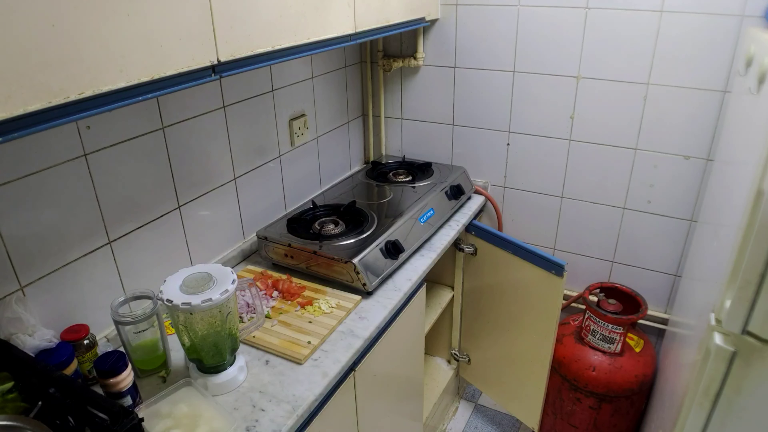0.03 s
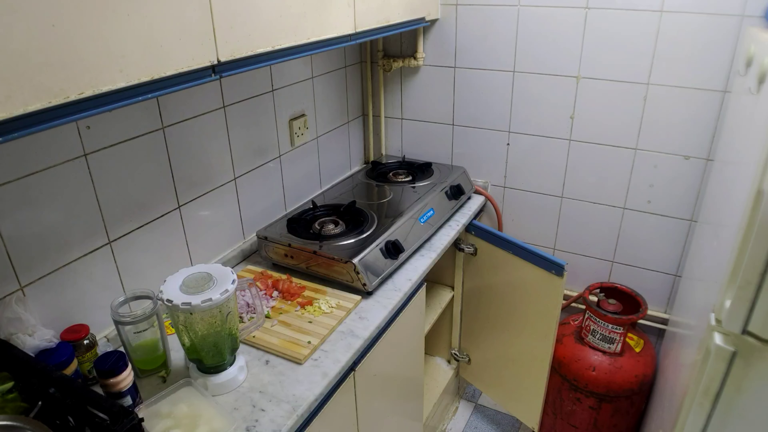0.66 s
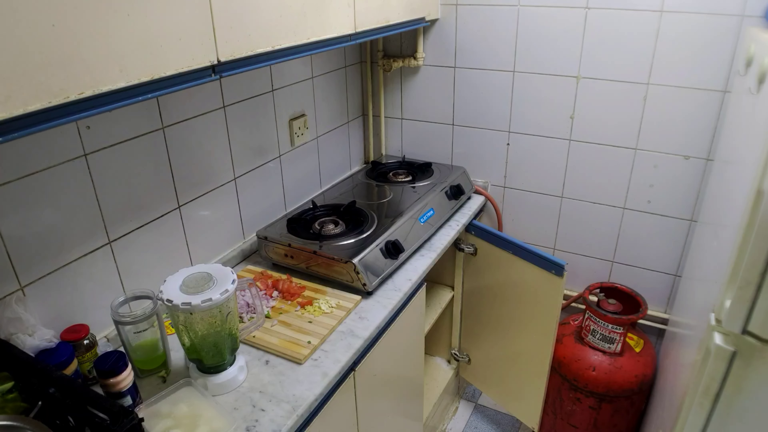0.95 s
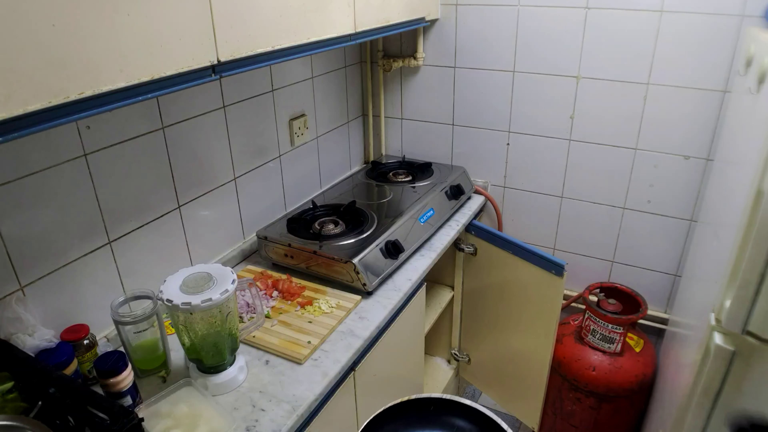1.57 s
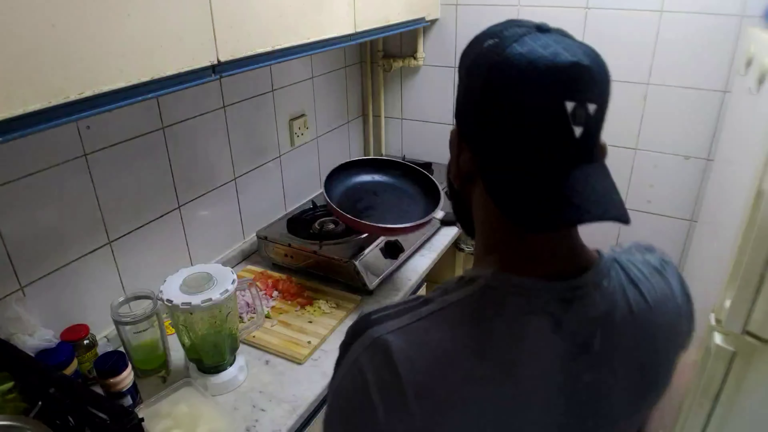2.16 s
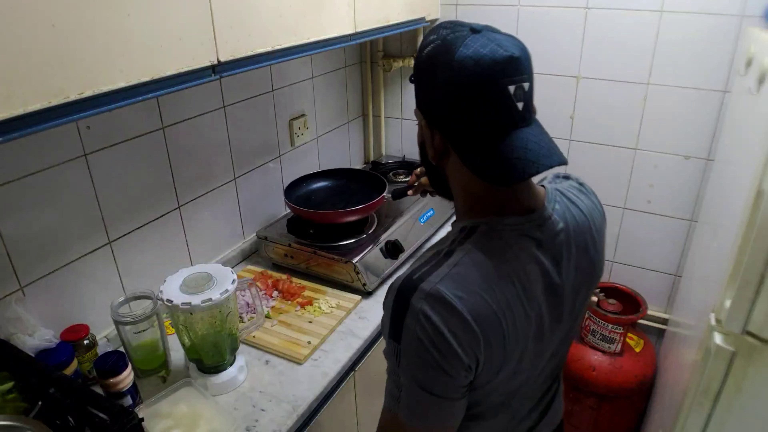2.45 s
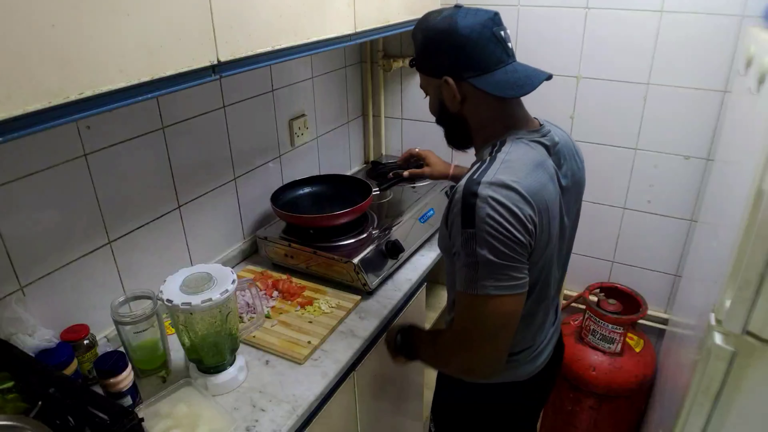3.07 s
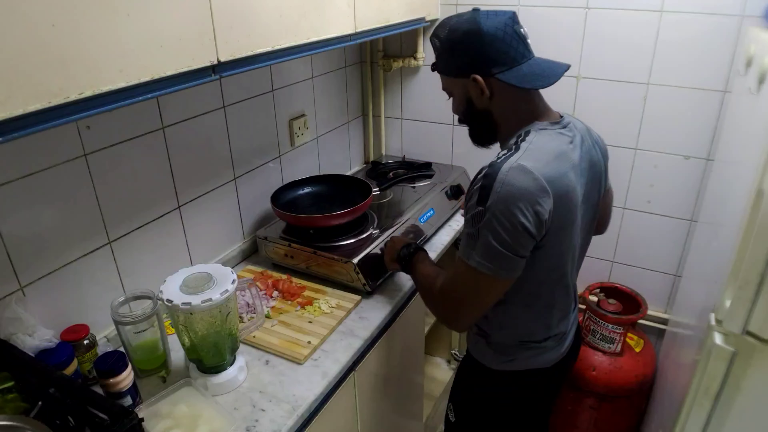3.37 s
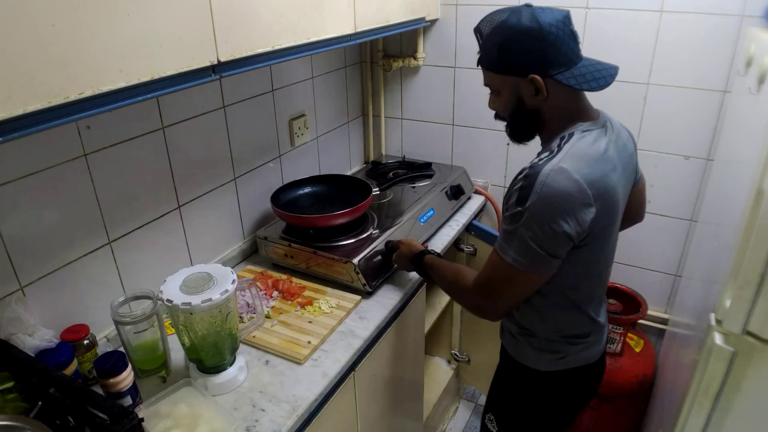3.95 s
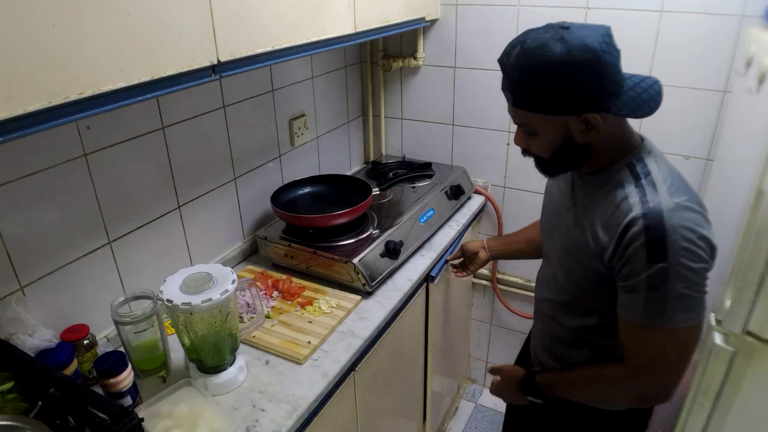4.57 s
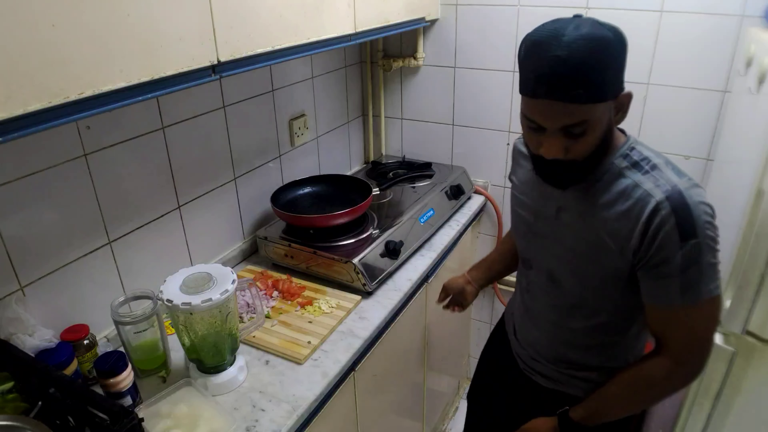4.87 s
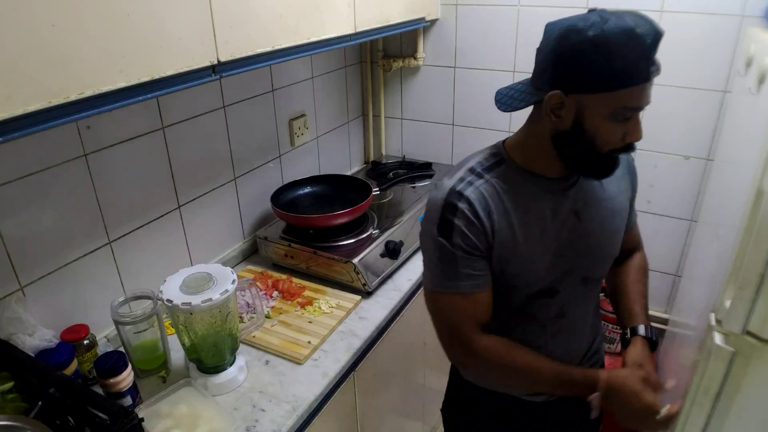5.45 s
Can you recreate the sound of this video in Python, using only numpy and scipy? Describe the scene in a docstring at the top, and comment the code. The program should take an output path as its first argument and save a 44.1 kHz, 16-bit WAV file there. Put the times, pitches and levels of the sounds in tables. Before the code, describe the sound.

A frying pan clanks down on a gas stove with a few ringing knocks, after a quiet shoe scuff and some light handling ticks. Small knob clicks lead to the sharp snap of the igniter, the loudest sound, and a faint hiss of flame follows. Last, a cupboard door swings shut with a thud. The nearby microphone picks up the short echo of tiled kitchen walls and a faint steady hum.

```python
"""Lighting the gas stove

In a small tiled kitchen a shirt rustles and a foot scuffs. A frying pan lands on the grate of a
sheet-steel stove and rocks into place, clacking and ringing. The gas knob is pushed and turned, its
spring igniter snaps and the burner starts to hiss. A cupboard door swings shut with a slap and a thump.
An appliance hums faintly throughout."""
import sys
import numpy as np
from scipy import signal
from scipy.fft import rfft, irfft, next_fast_len
from scipy.io import wavfile
from scipy.ndimage import map_coordinates

SR = 44100
rng = np.random.default_rng(int(sys.argv[2]) if len(sys.argv) > 2 else 0)


def put_to_file(sound):
    """Save the sound as 16-bit audio at rate SR, in the file named by the first command-line argument."""
    columns = np.atleast_2d(sound).T  # one column per channel
    safe = np.clip(columns, -1, 1)
    whole_steps = np.round(safe * 32767)
    wavfile.write(sys.argv[1], SR, whole_steps.astype(np.int16))


N = 242991

# pan meeting the grate: start_s, relative_db, cutoff_hz, pan_ring_db, first_rebound_s, rebound_loss_db
PAN_LANDINGS = [(2.7992, -21, 7500, 2, .022, 9.5), (2.953, -29, 620, -30, .034, 6),
                (3.018, -35, 2200, -20, 0.025, 11), (3.029, -17.5, 4800, -4, .031, 6.5),
                (3.1715, -26.5, 4600, -15, .023, 6), (3.285, -40.5, 1190, -25, .02, 6)]
# knob clicks and igniter snap: start_s, relative_db, low_edge_hz, cutoff_hz, valve_ring_db
KNOB_CLICKS = [(3.622, -46, 1500, 3500, -26), (3.638, -39, 1360, 3050, -10), (3.789, -33, 950, 7840, -28),
               (3.797, -28, 300, 4660, -5), (4.0572, -31, 2000, 5000, -4), (4.0605, -12, 1220, 15200, -14),
               (4.068, -20.5, 230, 1400, -27), (4.097, -31, 201, 1500, -9), (4.215, -32, 1100, 2760, -8),
               (4.435, -41.5, 1500, 4420, -4.5)]
# door on its frame and catch: start_s, relative_db, cutoff_hz, panel_ring_db
DOOR_KNOCKS = [(4.889, -25, 9000, -1.5), (4.894, -23, 12000, -29), (4.903, -29.5, 5000, -6),
               (5.065, -46, 3000, -5), (5.122, -47, 9000, -11)]
# light handling ticks: start_s, level_db, centre_hz
HANDLING_TICKS = [(1.552, -61, 3440), (2.1662, -47, 3260), (2.543, -56.5, 6600), (2.565, -60, 6660),
                  (4.757, -50.5, 3330)]
# hinge groans: peak_s, level_db
HINGE_GROANS = [(4.64, -62), (4.78, -57)]
# shirt rustles: peak_s, level_db, rise_s, fall_s
SHIRT_RUSTLES = [(.03, -62, .3, 0.37), (.19, -60, .07, 0.05), (.46, -66, 0.18, .1), (1.09, -57, 0.09, .06),
                 (1.71, -57.5, 0.063, 0.044)]

# ringing modes of each part: pitch_hz, relative_db, t60_s (capped where the part is struck)
PAN_MODES = [(657, -13, .3), (872, -4, .14), (1453, -18, .35), (1952, 0, .48), (2676, -6.5, .4),
             (3079, -7, .22), (3494, -11, .28), (4060, -12, .3), (4414, -15, .36), (4662, -24, .4),
             (5650, -24, .2), (6390, -13, .23), (6551, -22, .25), (7750, -25, .2), (9100, -24, .16)]
GRATE_MODES = [(719, -5, 0.97), (925, -9, 0.8), (1057, -4, 0.93), (1180, -13, 0.73), (1225, -13, 0.68),
               (1300, -24, 0.52), (1646, -3, 0.39), (1940, 4, 0.11), (2320, -18, 0.39), (2305, -9, 0.65),
               (2400, -28, 0.78), (2400, -24, 1.1), (2660, -7.5, 0.77), (2729, -15, 0.27),
               (2920, -23, 0.53), (2920, -12, 0.3), (3130, -19, 0.36), (3470, -5, 0.19), (3590, -6, 0.69),
               (3520, -6, 0.8)]
CASE_LOW_MODES = [(340, -7, .17), (378, -4, .15), (608, -12, .3), (668, -15, .4)]
CASE_HIGH_MODES = [(820, -20, 1.05), (990, -26, 0.71), (1190, -32, 0.97), (1236, -29, 0.62),
                   (1300, -12, 1.2), (1370, -8, 0.98), (1630, -30, 0.67), (1764, -18, 1), (1880, -14, 1.3),
                   (2030, -10, 1.2), (2083, -12, 1.1), (2240, -6, 0.43), (2500, -34, 0.88),
                   (2580, -25, 0.55), (2724, -29, 0.78), (2870, -18, 0.39), (3000, -30, 0.71),
                   (3200, -24, 0.4), (3381, -28, 0.46), (3580, -1, 0.37), (3780, -23, 0.44),
                   (3860, -30, 0.47), (3941, -22, 0.32), (4140, 5, 0.12), (4240, -5, 0.56)]
VALVE_MODES = [(688, -8, 0.51), (764, -5, 0.25), (1096, -9, 0.45), (1187, -11, 0.51), (1390, -8, 0.31),
               (2310, -7.5, 0.28), (3460, -3.5, 0.27), (3680, -7, 0.3), (4230, -10, .4), (4657, -16.5, .28)]
DOOR_MODES = [(1047, -13, 0.58), (1458, -7.5, 0.51), (2040, -19, 0.71), (2868, -2, 0.17), (2960, -7, 0.62),
              (2840, 5.5, 0.19), (3640, -20, 0.54), (3860, -16, 0.14), (4151, -19, 0.23), (4280, -19, 0.68)]
# broad resonances of the pan's clack: centre_hz, width_hz, gain_db
CLACK_PEAKS = [(327, 72, -9), (680, 115, -0.5), (940, 195, 0.5), (1217, 126, 1), (1630, 500, -2),
               (1997, 136, 2), (2364, 103, -1), (2710, 230, -2.5), (3080, 90, -3), (3440, 350, -5.5),
               (4090, 250, -7), (4480, 290, -8.5), (5420, 450, -16), (6330, 540, -12.5), (7730, 380, -18.5),
               (8900, 1200, -22), (12900, 2700, -39)]

# tone curves that colour each noise: frequency_hz, gain_db
SKID_EQ = [(200, -73), (1500, -25), (4000, 8), (9000, -4.5), (10500, -13), (15500, -20)]
SNAP_EQ = [(130, -25.5), (260, -12.5), (345, -7), (400, -5), (550, -6), (680, 1.5), (1000, -6.5),
           (2100, -2), (2750, -7), (3650, -1.5), (5200, -13), (7600, -10.5), (13000, -20), (15500, -25)]
FLAME_EQ = [(100, -3.5), (300, -8), (800, 4.5), (1500, -1), (4200, -8), (5200, -34), (6000, -8.5),
            (6450, -1.5), (7000, -16), (10000, -29), (15500, -30)]
SLAP_EQ = [(60, -12), (150, -8.5), (220, -10), (400, -14), (490, -2), (800, 0.5), (2000, -1.5), (3000, -2),
           (4200, -2.5), (5000, -16.5), (6500, -20.5), (9000, -30), (15500, -53)]
SOLE_EQ = [(240, -62), (400, -24.5), (633, 4), (957, -2.5), (1050, -4), (1470, 2), (4030, 4.5), (7210, -2),
           (15500, -25)]
SHIRT_EQ = [(300, -66), (1500, -1), (3000, 0.5), (4200, 4), (5200, -8.5), (8000, -9), (15500, -31)]
WHINE_EQ = [(500, -73), (2500, -43), (3600, -12), (4200, -7), (4550, -16), (5900, -24.5), (6400, -12.5),
            (7000, -20.5), (10000, -46)]
AIR_EQ = [(22, -42), (45, 3.5), (80, -11), (130, -2.5), (210, -6.5), (270, 2.5), (500, -6.5), (700, -1.5),
          (1200, -6), (2200, -9.5), (4250, -13), (4700, -25.5), (6800, -21.5), (15500, -28.5)]
# tones of the appliance's hum: pitch_hz, relative_db
HUM_TONES = [(269.2, -82), (925.9, -73.5), (2390, -74.5), (2638, -76.5), (2880, -72.5), (3025, -74.5),
             (3074, -76), (6385, -80)]
# late decay of the tiled room: frequency_hz, t60_s
ROOM_DECAY = [(100, 0.31), (300, 0.44), (700, 0.99), (2000, 0.8), (4000, 0.81), (8000, 0.73), (14000, 0.42)]


def pan(rebounds=2):
    """The pan lands, skids and rocks on the prongs: each time rim, base, then ever softer rebounds."""
    rim_lead_s, rim_db, rim_brighter = .0036, -4, 1.55
    flight_shrink, rebound_duller, damping_db = .85, .77, -16
    skid = swell(2.94, -44.5, rise_s=.1, fall_s=.11) * noise(SKID_EQ) * amp(2.3 * wobble(240, N))
    out = kitchen(skid, wet_db=-2)
    for s, db, cutoff_hz, ring_db, flight_s, loss_db in PAN_LANDINGS:
        damped_db = ring_db + damping_db  # the grate damps the bowl
        add(out, s, pan_contact(db + rim_db, cutoff_hz * rim_brighter, damped_db))
        s += rim_lead_s
        add(out, s, pan_contact(db, cutoff_hz, ring_db))
        for k in range(rebounds):
            s += flight_s * flight_shrink ** k
            db -= loss_db
            cutoff_hz *= rebound_duller
            add(out, s, pan_contact(db, cutoff_hz, damped_db))
    return out


def pan_contact(db, cutoff_hz, bowl_db, grate_db=-12, trim_db=-2):
    """One touch of pan on prong: a clack, and bowl and grate ring together."""
    echo = amp(6.5) * walls(early_t60=.28, late_db=-6)
    clack = contact(resonances(CLACK_PEAKS), echo, 430, cutoff_hz, t60=.035)
    bowl = ring(PAN_MODES, cutoff_hz, max_t60=.45, waver_rad=.2, scatter_db=1)
    grate = ring(GRATE_MODES, cutoff_hz, max_t60=.64, waver_rad=1)
    return amp(db + trim_db) * (clack + amp(bowl_db) * bowl + amp(grate_db) * grate)


def gas_knob(trim_db=-2):
    """The knob is pressed in, clicks round and trips the igniter's hammer inside the steel case."""
    out = np.zeros(N)
    for s, db, low_hz, cutoff_hz, valve_db in KNOB_CLICKS:
        case_db = -8 + .24 * db  # the harder the blow, the more the sheets rattle on in the room
        echo = amp(5.5) * walls(early_t60=.27, late_db=case_db + 10)
        snap = contact(colour(SNAP_EQ), echo, low_hz, cutoff_hz, t60=.071)
        case = ring(CASE_LOW_MODES + CASE_HIGH_MODES, cutoff_hz, max_t60=1, waver_rad=.66)
        valve = ring(VALVE_MODES, cutoff_hz=12000, max_t60=.51, waver_rad=.93)
        add(out, s, amp(db + trim_db) * (snap + amp(case_db) * case + amp(valve_db) * valve))
    return out


def burner(open_s=3.85, opening_s=.1):
    """The valve opens, gas whistles thinly through the jet and the flame builds, flutters and settles."""
    valve = np.clip((np.arange(N) / SR - open_s) / opening_s, 0, 1)
    flare = swell(4.6, -52, rise_s=1.6, fall_s=2.9)
    return valve * flare * noise(FLAME_EQ) * amp(.98 * wobble(12, N))


def cupboard_door(groan_hz=118, trim_db=-.5):
    """The hinge groans low as the door swings; it slaps its frame and chatters in the catch."""
    groans = sum(swell(s, db, rise_s=.06, fall_s=.13) for s, db in HINGE_GROANS)
    out = groans * tone(groan_hz, waver_rad=1.2, waver_hz=21)
    for s, db, cutoff_hz, panel_db in DOOR_KNOCKS:
        echo = amp(5.5) * walls(early_t60=.38, late_db=-11.5)
        slap = contact(colour(SLAP_EQ), echo, 50, cutoff_hz, t60=.043)
        panel = ring(DOOR_MODES, cutoff_hz, max_t60=.7, waver_rad=.6)
        add(out, s, amp(db + trim_db) * (slap + amp(panel_db) * panel))
    return out


def cupboard_thump(start_s=4.893, thump_hz=62, boom_hz=52):
    """The shutting door squeezes the air in the cupboard: a thump and a faint room boom."""
    out, t = np.zeros(N), np.arange(SR) / SR
    thump = amp(-27) * np.sin(2 * np.pi * thump_hz * t) * decay(.18)
    boom = amp(-47) * np.sin(2 * np.pi * boom_hz * t) * decay(.99)
    attack = 1 - decay(.026)
    add(out, start_s, -(thump + boom) * attack)
    return out


def scuff_and_rustle():
    """A sole brushes the floor with a gritty scuff; a shirt rustles in soft swells."""
    scuff = swell(1.427, -43, rise_s=.079, fall_s=.052) * noise(SOLE_EQ) * amp(1.4 * wobble(300, N))
    rustle = sum(swell(*row) for row in SHIRT_RUSTLES) * noise(SHIRT_EQ)
    return kitchen(scuff + rustle, wet_db=-4.5)


def handling_ticks():
    """The pan's handle and the door tick lightly under the hand."""
    out = np.zeros(N)
    for s, db, hz in HANDLING_TICKS:
        tick_eq = [(hz / 8, -14), (hz / 2, -3), (hz * 1.18, 0), (hz * 1.57, -12), (hz * 5, -25)]
        echo = amp(8) * walls(early_t60=.39, late_db=-16)
        add(out, s, amp(db) * contact(colour(tick_eq), echo, 300, 14000, t60=.019))
    return out


def appliance(drone_hz=95, throb_hz=2.2, throb_depth_db=13, peak_s=.98, hum_trim_db=-.5):
    """An unsteady hum, a thin whine and a low drone whose throb swells early and then fades."""
    hum = np.zeros(N)
    for hz, db in HUM_TONES:
        level = amp(db + hum_trim_db + 2.1 * wobble(3.8, N))
        hum += level * tone(hz, waver_rad=1.36, waver_hz=10)
    t = np.arange(N) / SR
    dip = (1 - np.cos(2 * np.pi * throb_hz * (t - peak_s))) / 2
    throb = amp(-throb_depth_db * dip) * swell(peak_s, -63, rise_s=.8, fall_s=4)
    resting = amp(-74.5)
    drone = np.hypot(resting, throb) * tone(drone_hz, waver_rad=.5, waver_hz=6.5)
    whine = amp(-68 + wobble(6.06, N)) * noise(WHINE_EQ)
    return hum + drone + whine


def room_air(level_db=-57.5):
    """A soft, nearly steady bed of room tone."""
    return amp(level_db + .2 * wobble(4.16, N)) * noise(AIR_EQ)


def kitchen(x, wet_db):
    """A sustained sound with the walls' reverb mixed in."""
    tail = walls(early_t60=.27, late_db=-5)
    wet = signal.fftconvolve(x, tail / np.linalg.norm(tail))[:len(x)]
    return x + amp(wet_db) * wet


def walls(early_t60, late_db, build_s=.00067):
    """Close tiled walls answer in a dense rush, followed by a longer, duller tail."""
    hz, t, spectrum = signal.stft(rng.standard_normal(SR), SR, nperseg=256)
    fade = np.exp(-np.log(1000) * t / along(ROOM_DECAY, hz)[:, None])
    late = signal.istft(spectrum * fade, SR, nperseg=256)[1][:SR]
    early = rng.standard_normal(SR) * decay(early_t60)
    attack = 1 - np.exp(-np.arange(SR) / SR / build_s)
    return unit((unit(early) + amp(late_db) * unit(late)) * attack)


def contact(body, echo, low_hz, cutoff_hz, t60):
    """A blow on a plate and its echo: a mass of short-lived modes, thin if light, dull if soft."""
    burst = unit(rng.standard_normal(SR) * decay(t60)) + echo
    band = lambda hz: hz ** 2 / np.sqrt((hz ** 4 + low_hz ** 4) * (1 + (hz / cutoff_hz) ** 4))
    return onset_unit(filtered(burst, lambda hz: body(hz) * band(hz)))


def ring(modes, cutoff_hz, max_t60, waver_rad, scatter_db=2):
    """The long-lived modes, at new strengths for each blow; the room makes each one waver."""
    t = np.arange(SR) / SR
    out = np.zeros(SR)
    for hz, db, t60 in modes:
        phase = 2 * np.pi * (hz * t + rng.random())
        drift = np.interp(t, np.linspace(0, 1, 50), rng.standard_normal(size=50))
        gain = amp(db + scatter_db * rng.standard_normal()) / np.sqrt(1 + (hz / cutoff_hz) ** 4)
        out += gain * decay(min(t60, max_t60)) * np.sin(phase + waver_rad * drift)
    attack = (1 - decay(.017)) ** 2
    return onset_unit(out * attack)


def tone(hz, waver_rad, waver_hz):
    """A sine of rms 1 with a wandering phase."""
    return np.sqrt(2) * np.sin(2 * np.pi * hz * np.arange(N) / SR + waver_rad * wobble(waver_hz, N))


def noise(eq):
    """Steady coloured noise of rms 1."""
    return unit(filtered(rng.standard_normal(N), colour(eq)))


def filtered(x, gain):
    """Minimum-phase EQ with the given gain against frequency: nothing rings ahead of a hit."""
    m = 2 * next_fast_len(len(x))
    response = np.maximum(gain(np.fft.rfftfreq(m, 1 / SR)), 1e-6)
    cepstrum = irfft(np.log(response), m)
    cepstrum[1:m // 2] *= 2
    cepstrum[m // 2 + 1:] = 0
    return irfft(rfft(x, m) * np.exp(rfft(cepstrum)), m)[:len(x)]


def colour(eq):
    """Gain against frequency from a tone curve."""
    return lambda hz: amp(along(eq, hz))


def resonances(peaks):
    """Gain against frequency of a body with broad resonances."""
    return lambda hz: np.sqrt(sum(amp(db) ** 2 / (1 + ((hz - centre) / width * 1.56) ** 2) ** 1.72
                                  for centre, width, db in peaks))


def along(points, hz):
    """Read a curve of (frequency_hz, value) points on a log axis."""
    frequencies, values = np.transpose(points)
    return np.interp(np.log(hz + 1), np.log(frequencies + 1), values)


def swell(peak_s, db, rise_s, fall_s):
    """An envelope that climbs 20 dB per rise_s to its peak, then drops 20 dB per fall_s."""
    t = np.arange(N) / SR - peak_s
    return amp(db - 20 * np.maximum(-t / rise_s, t / fall_s))


def decay(t60):
    """A one-second envelope that falls 60 dB in t60 seconds."""
    return np.exp(-np.log(1000) * np.arange(SR) / SR / t60)


def wobble(rate_hz, n):
    """A smooth random curve through rate_hz knots a second."""
    knots = rng.standard_normal(int(n * rate_hz / SR) + 4)
    return map_coordinates(knots, [np.arange(n) * rate_hz / SR])


def add(track, start_s, sound):
    """Mix a sound into the track."""
    part = track[round(start_s * SR):][:len(sound)]
    part += sound[:len(part)]


def amp(db):
    """Decibels to gain."""
    return 10 ** (np.asarray(db) / 20)


def unit(x):
    """Scale to rms 1."""
    return x / np.sqrt(np.mean(x ** 2) + 1e-20)


def onset_unit(x):
    """Scale so that the first 30 ms have rms 1."""
    return x / np.sqrt(np.mean(x[:int(.03 * SR)] ** 2) + 1e-20)


def scene():
    """The whole kitchen, mixed in mono."""
    hits = pan() + gas_knob() + cupboard_door() + cupboard_thump()
    movement = scuff_and_rustle() + handling_ticks()
    return (hits + movement + burner() + appliance() + room_air())[None]


def record(dry, top_hz=15600):
    """A brick-wall low-pass takes off the very top."""
    m = next_fast_len(N + SR // 2)
    passband = np.fft.rfftfreq(m, 1 / SR) < top_hz
    return irfft(rfft(dry, m) * passband, m)[..., :N]


dry = scene()
out = record(dry)
put_to_file(out)
```